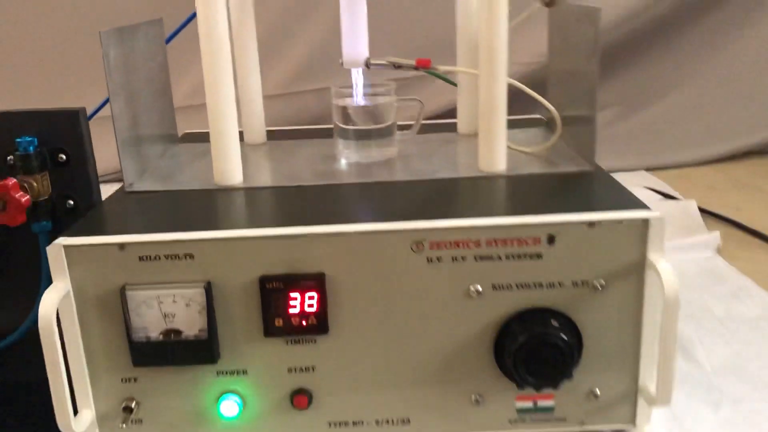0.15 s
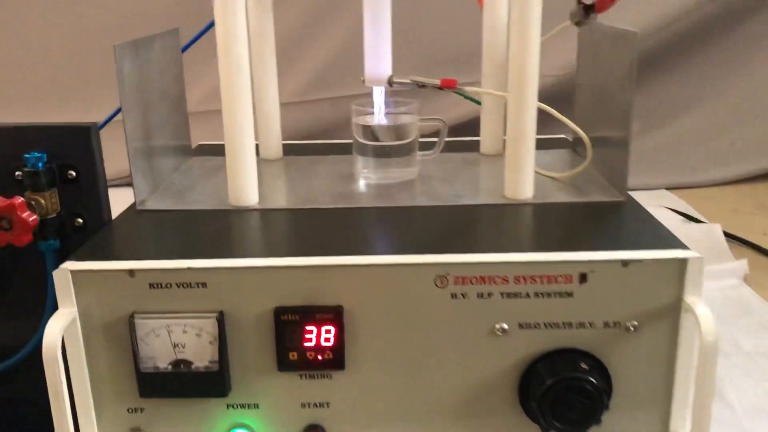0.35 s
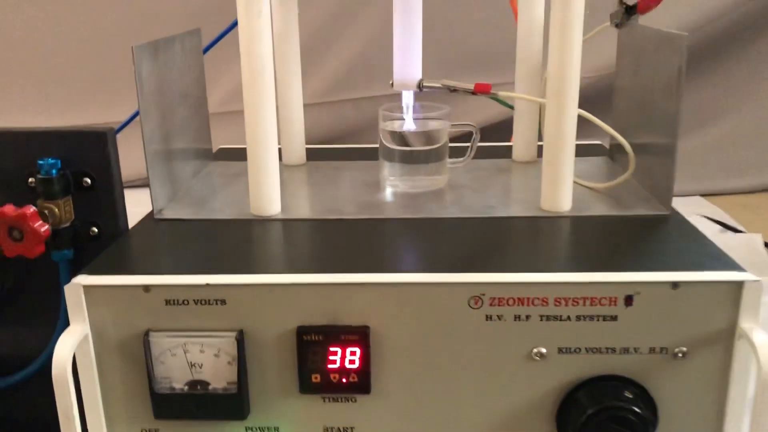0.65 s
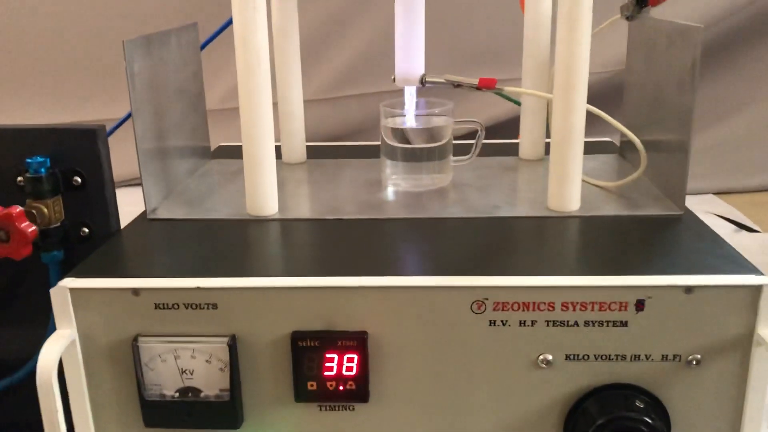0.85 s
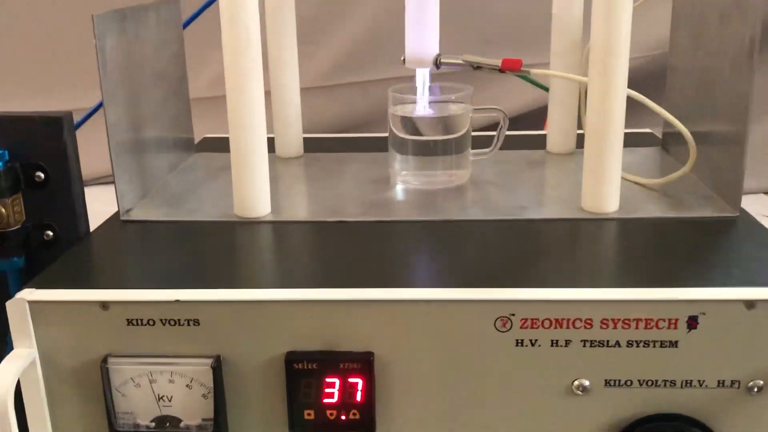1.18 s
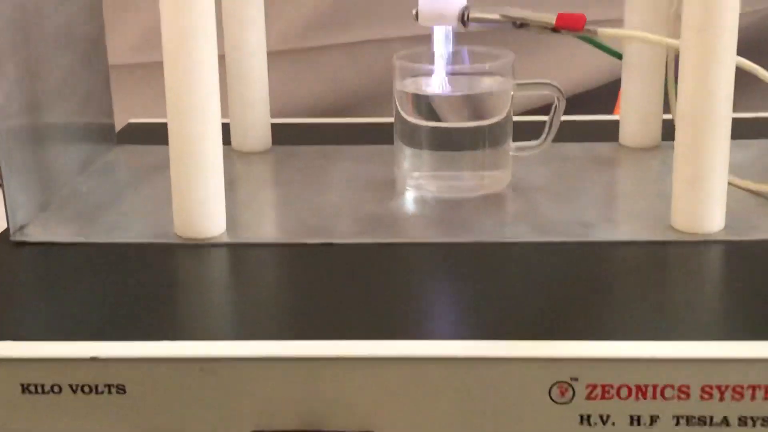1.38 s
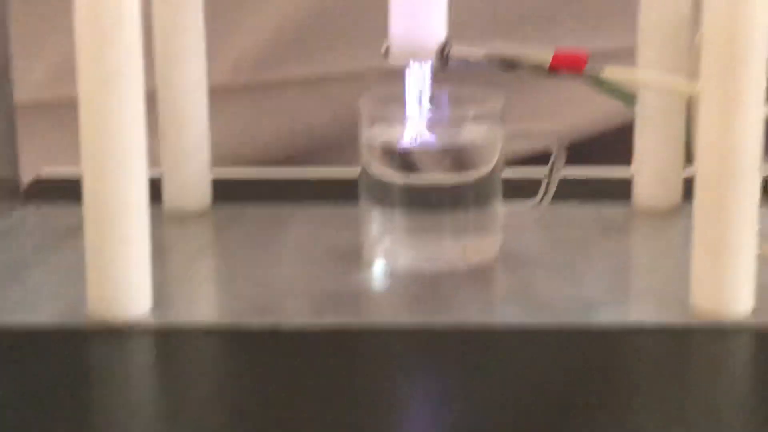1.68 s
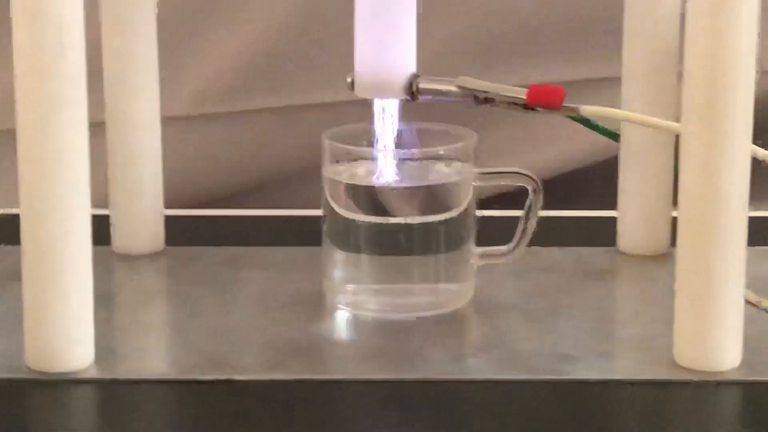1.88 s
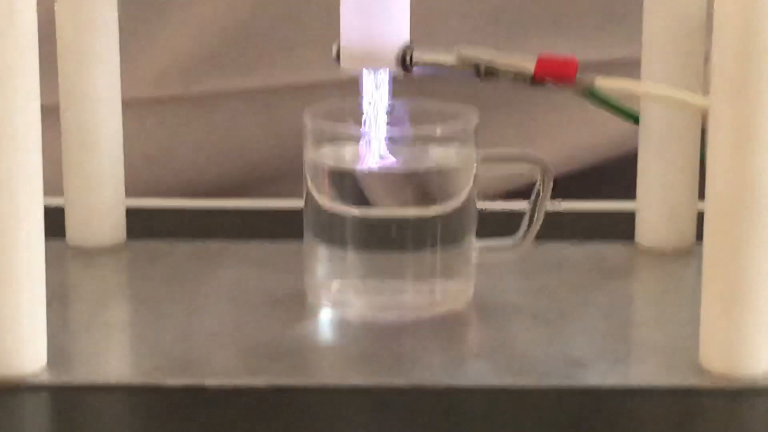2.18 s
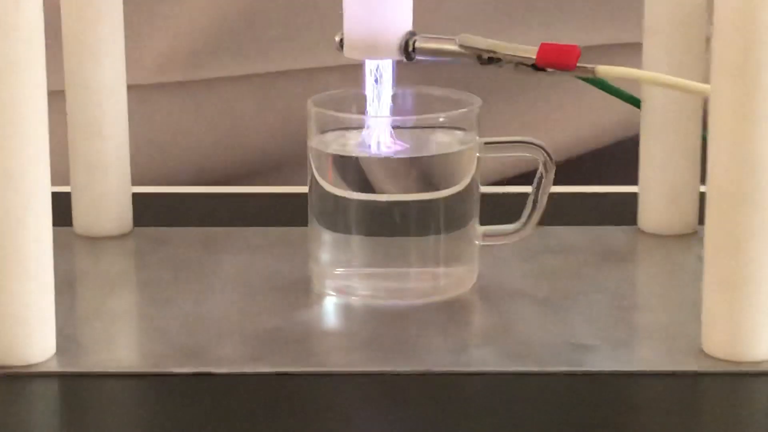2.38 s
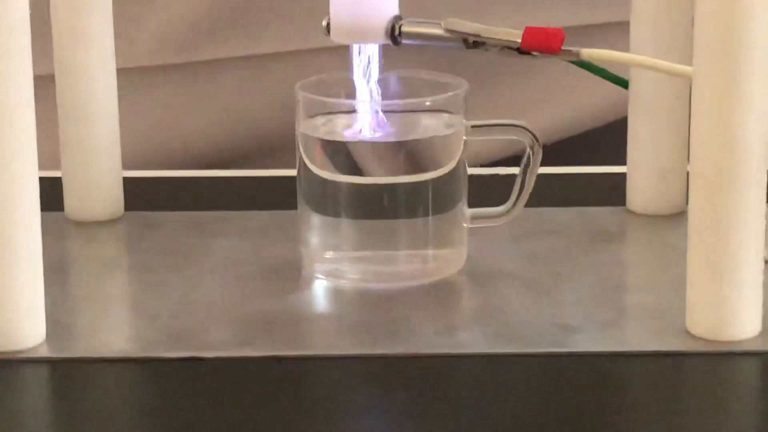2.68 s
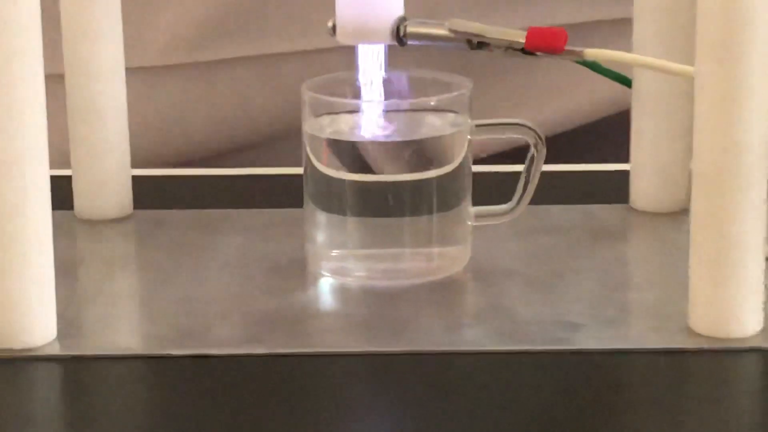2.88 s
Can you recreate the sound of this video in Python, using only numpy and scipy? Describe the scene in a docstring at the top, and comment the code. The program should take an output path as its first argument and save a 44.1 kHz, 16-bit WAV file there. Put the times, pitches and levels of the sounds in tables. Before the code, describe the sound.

A high-voltage plasma jet plays onto water in a glass, giving a steady, thin, very high whine inside a crackling hiss. It briefly cuts out and restrikes with small snaps. Gas hisses beneath, over a lab's faint hum.

```python
"""A thin, high whine in crackling hiss, now and then dying out and striking again with a snap.
It is a plasma jet, driven onto water in a glass by a high-voltage supply. A spark fires on every
half turn of the supply; the two polarities are unequal, which adds a whine an octave lower.
Each restrike cracks and rings the glass and plate. Gas hisses from the nozzle over the hum and
air noise of a lab."""
import sys
import numpy as np
from scipy import signal
from scipy.io import wavfile
from scipy.ndimage import uniform_filter1d

SR = 44100
rng = np.random.default_rng(int(sys.argv[2]) if len(sys.argv) > 2 else 0)


def to_wav(sig):
    """Store sig (one row per channel, or 1-D mono) as 16-bit WAV at the path in sys.argv[1].

    Samples outside -1..1 are clipped; the rate is SR.
    """
    pcm = np.clip(np.atleast_2d(sig), -1, 1) * 32767
    pcm = np.round(pcm).astype(np.int16)
    wavfile.write(sys.argv[1], SR, pcm.T)  # frames by channels


N = 134505
TIME = np.arange(N) / SR
HUM_HZ = 100  # supply ripple and transformer hum

# Pitch of the whine, sagging slowly: (time [s], spark rate [Hz])
SPARK_RATE = [(0, 13536), (.4, 13532), (1.3, 13528), (3.05, 13525)]
# Fader of the arc: (time [s], level [dB])
ARC_LEVEL = [(0.0, -27.5), (0.9, -27), (1.94, -28.5), (2.43, -27), (3.05, -28)]
# Polarity imbalance, heard as the lower whine: (time [s], mean level relative to a spark [dB])
IMBALANCE = [(0, -28), (.2, -28), (.3, -11.5), (.75, -15.5), (1.3, -10), (1.8, -13), (2.4, -12.5),
             (3.05, -11.5)]
# Bright tone of a spark: (frequency [Hz], gain [dB])
SPARK_EQ = [(300, -60), (1500, -38), (3000, -20), (5500, -21), (7000, -8), (9000, -12), (11000, -13),
            (12000, -5), (13000, 0), (13500, 0), (13800, 1.5), (14400, 0), (15230, -1.5), (15700, -5),
            (20000, -30)]
# Resonances and notches of glass, stand and plate: (centre [Hz], width [Hz], gain [dB])
GLASS_RESONANCES = [(1930, 150, 13), (2450, 250, 2), (2710, 110, -13), (2980, 50, -6), (3140, 120, 5),
                    (3830, 300, -7), (4250, 110, 7), (4420, 90, -5), (4620, 200, 7), (4980, 130, -6),
                    (5600, 200, 3), (5850, 160, -7), (6650, 130, -6), (6980, 300, 5), (7400, 400, 4),
                    (7660, 110, -7), (8350, 170, 4), (9800, 700, 9), (13450, 450, 6), (14100, 200, -4),
                    (14400, 250, 4), (14800, 300, -4), (15230, 350, 5)]
def arc():
    """One spark per half turn: the steady rate whines, the scatter in time and size hisses."""
    jitter_periods, size_spread_db, oversample = .17, 2.5, 16
    phase_slip = .04 * drift(hz=10)
    half_turns = np.cumsum(curve(SPARK_RATE)) / SR + phase_slip - phase_slip[0]
    spark = np.arange(1, int(half_turns[-1]))
    timing_scatter, size_scatter = rng.standard_normal((len(spark), 2)).T
    position = np.interp(spark + jitter_periods * timing_scatter, half_turns, np.arange(N))
    sample = position.astype(int)

    ripple = 2 * np.pi * HUM_HZ * TIME
    flicker_db = 1.7 * drift(hz=350) + .6 * drift(hz=25)
    strength = dropouts() * gain_of(flicker_db) * (1 + .12 * np.cos(ripple))
    imbalance = gain_of(curve(IMBALANCE)) * (1 + .9 * np.cos(ripple) + .22 * np.cos(2 * ripple))
    polarity_gain = 1 + (-1.) ** spark * imbalance[sample]
    size = strength[sample] * gain_of(size_spread_db * size_scatter) * polarity_gain

    # A finer grid lets the clicks fall between samples.
    clicks = np.bincount(np.round(oversample * position).astype(int), size, minlength=oversample * N)
    sparks = equalise(signal.resample_poly(clicks, 1, oversample), SPARK_EQ, GLASS_RESONANCES)
    return gain_of(curve(ARC_LEVEL)) * unit_rms(streamers(sparks))


def streamers(sparks):
    """Roaming streamers brighten and dull random patches of the hiss."""
    depth_db, patch_frames, patch_bins = 2.2, 4, 6
    spectrum = signal.stft(sparks, nperseg=128, noverlap=96)[2]
    patches = uniform_filter1d(rng.standard_normal(spectrum.T.shape), patch_frames, axis=0)
    patches = uniform_filter1d(patches, patch_bins, axis=1).T
    return signal.istft(spectrum * gain_of(depth_db * unit_rms(patches)), nperseg=128, noverlap=96)[1][:N]


# Cues where the arc dies and strikes again:
# (restrike time [s], gap [s], dip [dB], snap level [dB], pitch of the spot struck [Hz])
RESTRIKES = [(.0544, .003, -12, -50, 2700), (.0790, .007, -10, -46, 2300), (.0947, .003, -15, -44, 2700),
             (.1862, .004, -14, -48, 2700), (.2250, .010, -22, -40, 2600), (.2551, .005, -8, -50, 2700),
             (.6552, .004, -14, -46, 2700), (.8045, .004, -9, -50, 2700), (1.0107, .007, -11, -46, 2700),
             (1.1640, .003, -10, -48, 2700), (1.1848, .012, -16, -35, 2550), (1.2637, .010, -16, -46, 2700),
             (1.3470, .002, -6, -40, 2500), (1.3734, .003, -11, -48, 2700), (1.9262, .003, -10, -39, 2400),
             (1.9525, .009, -17, -39, 2400), (2.0474, .004, -11, -48, 2700), (2.5074, .004, -10, -48, 2700),
             (2.5265, .003, -10, -50, 2700), (2.7965, .004, -12, -37, 3050), (2.8265, .003, -12, -46, 3100),
             (2.8869, .003, -10, -48, 2700)]
FADE_S, STRIKE_S = .003, .0008
def dropouts():
    """Gain of the arc: it fades into each gap and comes back with a sudden strike."""
    db = 0
    for strike_at, gap_s, dip_db, *_ in RESTRIKES:
        dying = np.clip((TIME - strike_at + gap_s + FADE_S / 2) / FADE_S, 0, 1)
        still_out = np.clip((strike_at - TIME) / STRIKE_S + 1, 0, 1)
        db = db + dip_db * dying * still_out
    return gain_of(db)


# Ringing modes of glass and plate: (frequency [Hz], level [dB], decay by 60 dB [s])
GLASS_MODES = [(2300, 0, .03), (2550, 0, .035), (2950, -1, .04), (3150, -2, .08), (4600, -10, .03)]
# Bright edge of a strike: (frequency [Hz], gain [dB])
CRACK_EQ = [(3000, -34), (7000, -12), (10000, 13), (12500, -24), (15700, -23)]
def snaps():
    """Each restrike cracks and rings glass and plate, favouring modes near the pitch of the spot struck."""
    falloff_db_per_octave, crack_t60_s = 16, .012
    t = np.arange(3000) / SR
    attack = np.minimum(t / STRIKE_S, 1)
    rings, cracks = np.zeros((2, N + len(t)))
    for strike_at, _, _, snap_db, spot_hz in RESTRIKES:
        start = round(strike_at * SR)
        span = slice(start, start + len(t))
        onset = gain_of(snap_db) * attack
        for hz, mode_db, t60_s in GLASS_MODES:
            ring_db = mode_db - falloff_db_per_octave * abs(np.log2(hz / spot_hz)) - 60 * t / t60_s
            rings[span] += onset * gain_of(ring_db) * np.sin(2 * np.pi * (hz * t + rng.random()))
        cracks[span] += onset * gain_of(7 - 60 * t / crack_t60_s) * rng.standard_normal(len(t))
    return rings[:N] + equalise(cracks, CRACK_EQ)


def reflections(jet, level_db=-14, t60_s=.12):
    """A short, dense tail from plate and walls, after 2 ms of pre-delay."""
    t = np.arange(8000) / SR
    tail = rng.standard_normal(len(t)) * gain_of(-60 * t / t60_s) * (t > .002)
    return gain_of(level_db) * signal.oaconvolve(jet, tail / np.linalg.norm(tail))[:N]


# Fader of the nozzle hiss: (time [s], level [dB])
GAS_LEVEL = [(0, -42), (.5, -42), (.85, -41), (1.05, -40.5), (1.25, -41), (1.45, -40.5), (1.6, -40.5),
             (1.78, -40.5), (1.9, -41), (2.15, -40), (2.4, -40.5), (3.05, -41)]
# Breathy tone of the gas: (frequency [Hz], gain [dB])
GAS_EQ = [(600, -23.5), (1300, -6.5), (2200, -1.5), (3300, -3), (4000, -7.5), (5500, -9), (7200, -1),
          (9000, -11), (15700, -8)]
def nozzle_hiss():
    """Gas rushes from the nozzle with a slight flutter, coloured by glass, stand and plate."""
    flutter_db = .95 * drift(hz=45)
    hiss = equalise(rng.standard_normal(N), GAS_EQ, GLASS_RESONANCES)
    return gain_of(curve(GAS_LEVEL) + flutter_db) * unit_rms(hiss)


# Fader of the hum: (time [s], level [dB])
HUM_LEVEL = [(0.0, -68), (0.1, -62.5), (0.86, -53), (1.13, -71), (1.21, -53), (2.96, -59), (3.05, -63)]
def transformer_hum():
    """The transformer hums on one low tone that wavers in level."""
    waver_db = 3 * drift(hz=12)
    return gain_of(curve(HUM_LEVEL) + waver_db) * np.sqrt(2) * np.sin(2 * np.pi * HUM_HZ * TIME)


# Faders of the room's low end: (time [s], rumble level [dB], drone level [dB])
LOW_END_LEVELS = [(0, -48.5, -48), (.25, -49.5, -63), (.45, -50.5, -63), (.75, -46, -78),
                  (1.05, -60.5, -77), (1.3, -54, -65), (1.8, -53, -55.5), (2.1, -54.5, -64),
                  (2.5, -50, -56), (2.8, -62, -52), (3.05, -48, -58)]
# Dull tone of the room's air: (frequency [Hz], gain [dB])
AIR_EQ = [(12, -33), (20, -65), (59, -17), (85, -7.5), (102, -3.5), (251, -4), (387, -4), (526, -6),
          (715, -4.5), (841, -8.5), (1500, -17.5), (1950, -24), (3300, -120)]
def room_tone(air_db=-47):
    """The bed of the lab: a low rumble, a soft drone and steady air noise with one narrow resonance."""
    times, rumble_db, drone_db = np.transpose(LOW_END_LEVELS)
    rumble = gain_of(np.interp(TIME, times, rumble_db)) * noise_band(hz=164, width_hz=116)
    drone = gain_of(np.interp(TIME, times, drone_db)) * noise_band(hz=388, width_hz=27)
    air = equalise(rng.standard_normal(N), AIR_EQ + [(4000, -38)], bells=[(704, 17, 3.4)])
    return rumble + drone + gain_of(air_db) * unit_rms(air)


def gain_of(db):
    return 10 ** (np.asarray(db) / 20)


def unit_rms(x):
    return x / np.sqrt(np.mean(x ** 2) + 1e-20)


def curve(points):
    """A table of (time [s], value) read at every sample."""
    return np.interp(TIME, *np.transpose(points))


def drift(hz):
    """Random modulation up to about hz, rms 1."""
    return unit_rms(signal.lfilter(*signal.butter(2, hz, fs=SR), rng.standard_normal(N)))


def noise_band(hz, width_hz):
    """Noise through one resonance, rms 1."""
    return unit_rms(signal.lfilter(*signal.iirpeak(hz, hz / width_hz, SR), rng.standard_normal(N)))


def equalise(x, points, bells=()):
    """Minimum-phase EQ: a tone curve plus bells of (centre [Hz], width [Hz], gain [dB])."""
    hz = abs(np.fft.fftfreq(8192, 1 / SR))
    point_hz, point_db = np.transpose(points)
    db = np.interp(np.log(hz + 1), np.log(point_hz + 1), point_db)
    db += sum(peak_db / (1 + (2 * (hz - centre) / width) ** 2) for centre, width, peak_db in bells)
    log_gain = np.log(gain_of(db))
    phase = -signal.hilbert(log_gain).imag
    taps = np.fft.ifft(np.exp(log_gain + 1j * phase)).real[:4096]
    return signal.oaconvolve(x, taps)[:N]


def scene():
    """Mono mix: arc and snaps in front with their reflections, then gas, hum and room."""
    jet = arc() + snaps()
    return (jet + reflections(jet) + nozzle_hiss() + transformer_hum() + room_tone())[None]


def record(dry):
    """A steep high cut on the whole mix."""
    cutoff_hz = 15730
    high_cut = signal.firwin(1023, cutoff_hz, window=("kaiser", 9), fs=SR)
    return signal.oaconvolve(dry, high_cut[None], "same")


dry = scene()
out = record(dry)
to_wav(out)
```